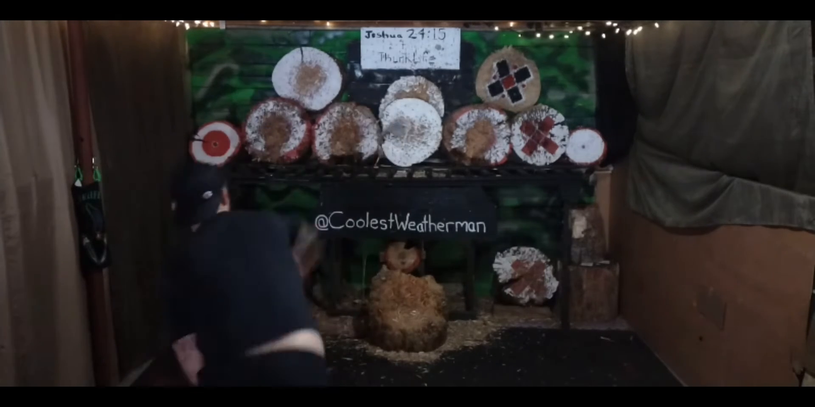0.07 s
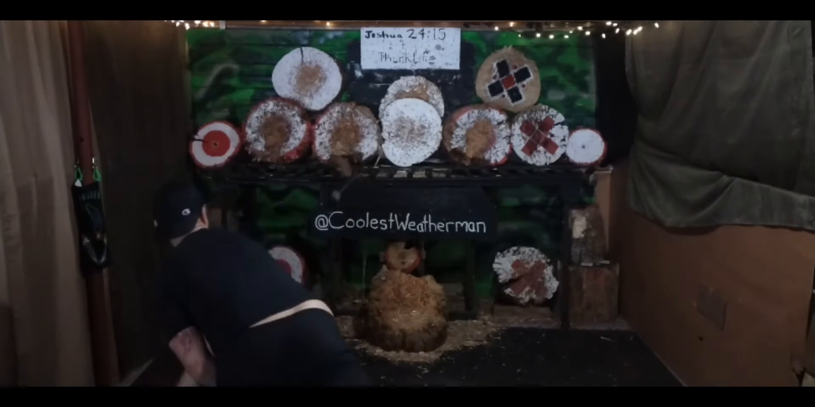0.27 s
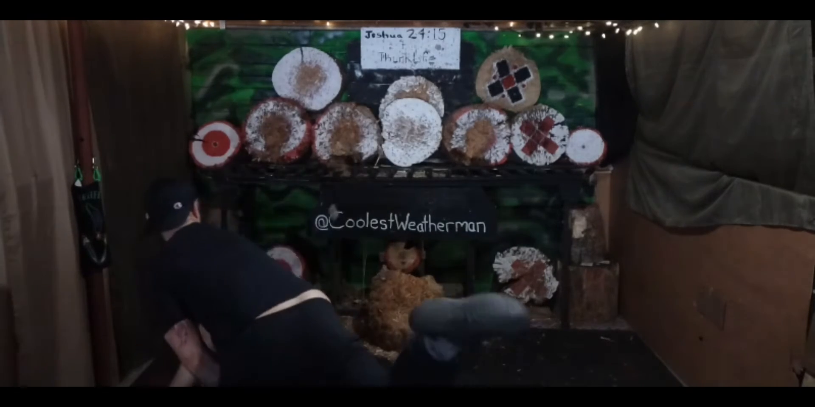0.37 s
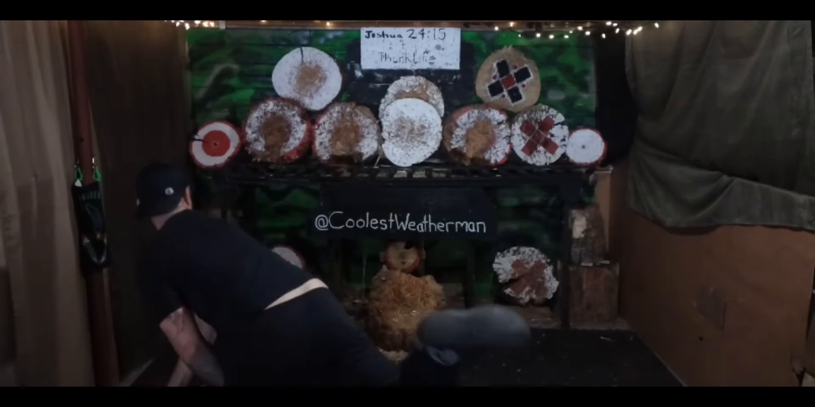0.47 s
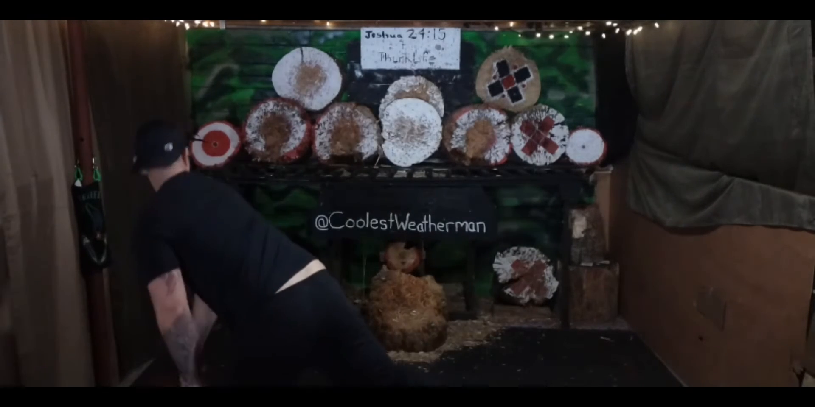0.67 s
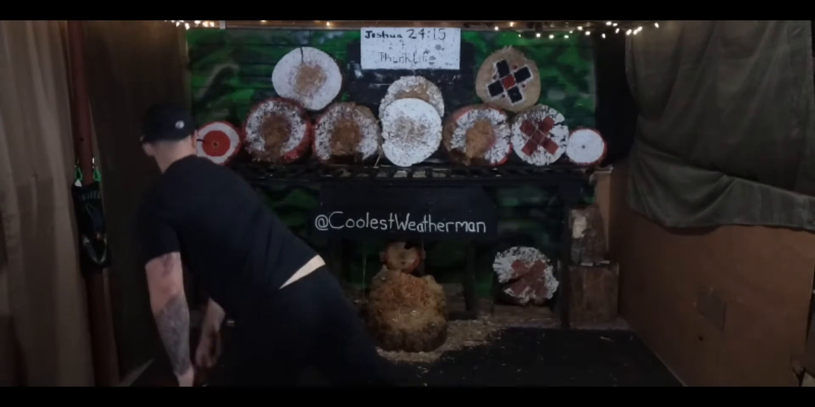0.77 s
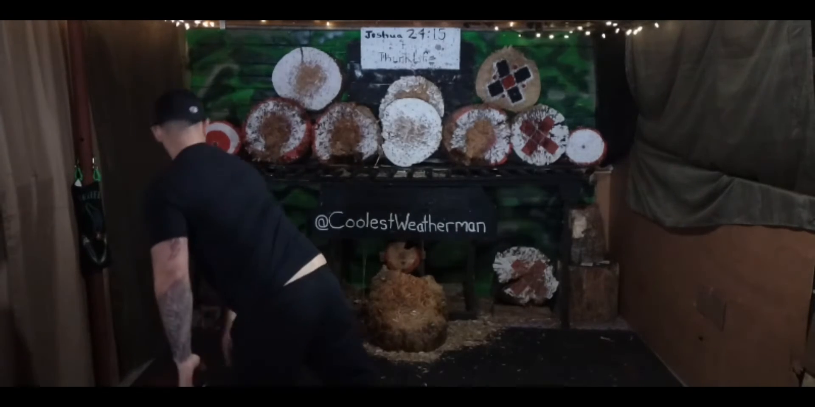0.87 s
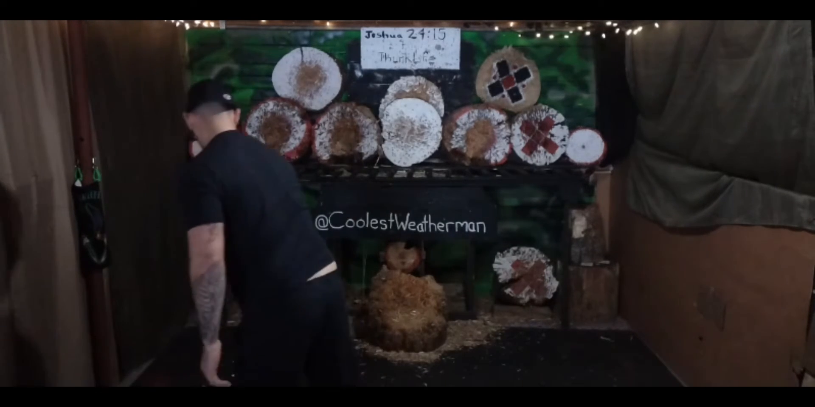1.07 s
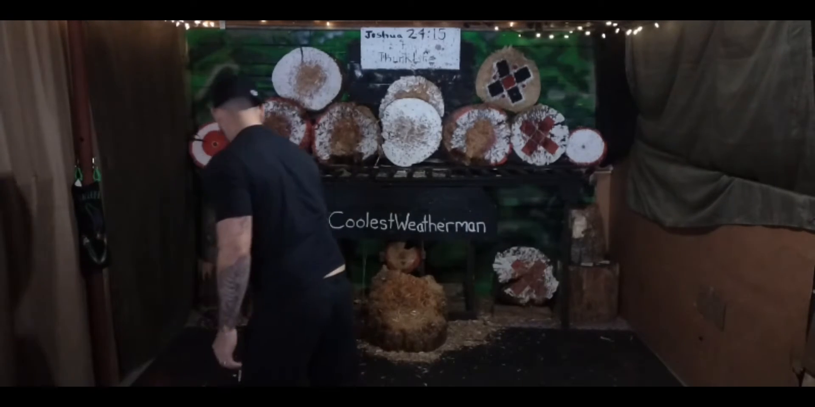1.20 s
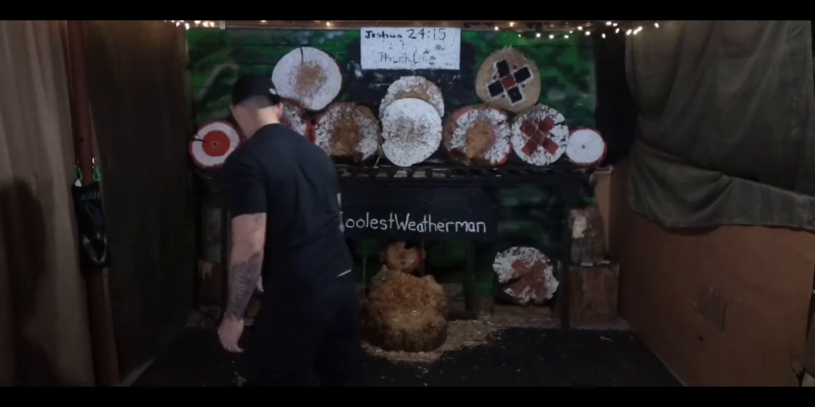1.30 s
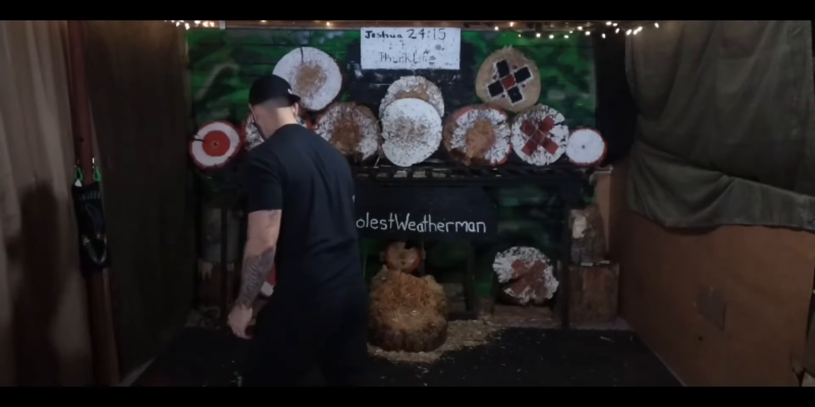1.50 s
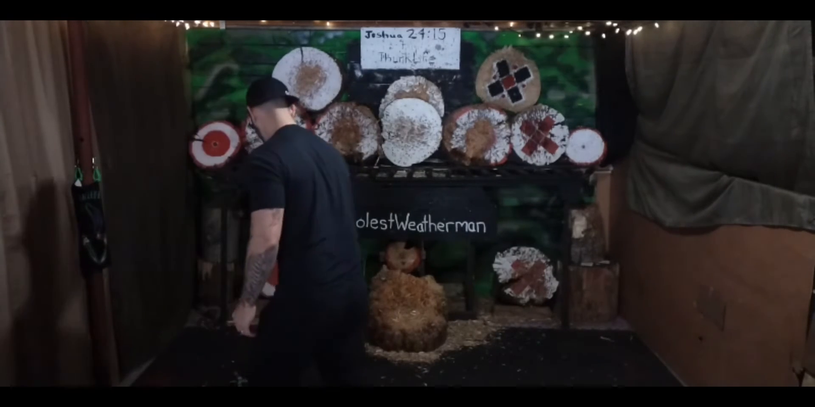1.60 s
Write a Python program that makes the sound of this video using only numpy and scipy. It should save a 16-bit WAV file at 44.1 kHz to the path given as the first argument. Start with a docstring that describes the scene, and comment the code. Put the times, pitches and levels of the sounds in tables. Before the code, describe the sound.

A knife hits a wooden target with a sharp, heavy thud and slight steel ring, then knocks onto the floor half a second later, with ever softer scuffing thumps, in a small wooden room, stereo microphone nearby.

```python
"""Over room air, cloth swishes, then a low rush leads to a thrown knife slamming into a log slice on a plank wall.
The wall and the steel ring as damped modes over decaying noise, and the small shed answers with a low boom.
The swish goes on and the structure rumbles; a faint steel tick precedes the knife landing on floor boards.
Ever weaker thumps with a scuff follow, with swells of rumble and one late brush of cloth.
Noise coloured in frequency makes the air, cloth, rush, rumble and blows; sines make rings, tick and booms."""
import sys
import numpy as np
from scipy import signal
from scipy.fft import rfft, irfft, next_fast_len
from scipy.io import wavfile
from scipy.ndimage import uniform_filter1d, map_coordinates

SR = 44100
rng = np.random.default_rng(int(sys.argv[2]) if len(sys.argv) > 2 else 0)


def inscribe(sig):
    """Save sig as 16-bit PCM at rate SR to the path in sys.argv[1].

    A 1-D sig is mono; a 2-D sig holds one channel per row.
    Samples are clipped to [-1, 1] before scaling.
    """
    pcm = np.round(np.clip(np.atleast_2d(sig).T, -1, 1) * 32767)
    wavfile.write(sys.argv[1], SR, pcm.astype(np.int16))


N = 72765  # length in samples


def amp(db):
    """Decibel law: 20 dB is a factor of ten in amplitude."""
    return 10 ** (np.asarray(db) / 20)


def along(points, hz):
    """Logarithmic pitch scale: interpolate (Hz, value) points evenly per octave."""
    point_hz, values = np.transpose(points)
    return np.interp(np.log(hz + 1), np.log(point_hz + 1), values)


def level(rows):
    """Amplitude envelope: (s, dB) rows become a gain per sample, straight in dB."""
    s, db = np.transpose(rows)
    return amp(np.interp(np.arange(N) / SR, s, db))


# Interchannel coherence. Each row: frequency in Hz, left-right correlation (1 is identical).
COHERENCE = [(60, .98), (200, .97), (400, .88), (700, .5), (1200, 0), (2500, .35), (6000, .35),
             (14000, .35)]
PATCHY_DB = 2  # standard deviation of the random gain patches in dB


def no_shape(hz, t):
    """Stationarity: 0 dB of change at every time."""
    return 0 * t


def noise(size, colour, shape_db=no_shape):
    """Partial coherence: two independent noises, scaled to rms 1 by colour, then shaped and mixed."""
    white = rng.standard_normal((2, size))
    hz, t, spectrum = signal.stft(white, SR, nperseg=512, noverlap=384)
    hz = hz[:, None]
    gain = amp(along(colour, hz))
    gain = gain / np.sqrt(np.mean(gain ** 2))
    patches = rng.standard_normal(spectrum.shape[1:])
    patches = uniform_filter1d(patches, size=4, axis=0)  # across frequency
    patches = uniform_filter1d(patches, size=12, axis=1)  # across time
    patches_db = PATCHY_DB * patches / np.std(patches)
    spectrum = spectrum * gain * amp(shape_db(hz, t) + patches_db)
    # The correlation is the cosine of twice the mixing angle.
    angle = np.arccos(np.clip(along(COHERENCE, hz), -1, 1)) / 2
    middle = spectrum[0] * np.cos(angle)
    side = spectrum[1] * np.sin(angle)
    pair = np.array([middle + side, middle - side])
    return signal.istft(pair, SR, nperseg=512, noverlap=384)[1][:, :size]


SHUDDER_LOSS = .4  # share of the decay rate while a blow still shudders


def ring(modes, t, hold=0):
    """Modal superposition: decaying sines, fed during the shudder, with a phase offset between channels."""
    out = np.zeros((2, len(t)))
    age = t - (1 - SHUDDER_LOSS) * np.minimum(t, hold)
    for hz, db, t60 in modes:
        wander = np.cumsum(rng.normal(0, .003, len(t)))
        offset = np.arccos(along(COHERENCE, hz)) * rng.choice([-.5, .5])
        decay = amp(db + rng.normal(0, 1) - 60 * age / max(t60, .01))
        out += decay * np.sin(2 * np.pi * hz * t + wander + [[offset], [-offset]])
    return out


# Spectrum of the initial crack. Each row: frequency in Hz, relative density in dB per Hz.
CRACK_COLOUR = [(200, -30.5), (700, 2), (1500, -15), (3000, -8), (4500, -14.5), (7000, -13.5),
                (12000, -22.5), (16000, -23)]
CRACK_S = 0.032  # time for the crack to fall 60 dB, before steepening
RATTLE_DB, RATTLE_PER_S = 1, 250  # depth and rate of the uneven grain of a blow
STEEPEN_DB_PER_S2 = 29.5  # tails fall faster as they fade


def blows(events, colour, t60_by_band, rings, crack_db=-80):
    """Impact excitation: noise shudders, then decays band by band in the shed as the struck bodies ring."""
    out = np.zeros((2, N + SR))
    t = np.arange(SR) / SR
    for s, db, attack, hold in events:
        def dying(hz, u):
            """Exponential decay: a straight fall in dB, slower during the shudder."""
            age = SHUDDER_LOSS * np.minimum(u, hold) + np.maximum(u - hold, 0)
            return -60 * age / along(t60_by_band, hz)

        rattle = map_coordinates(rng.standard_normal(SR), [t * RATTLE_PER_S])
        body = noise(SR, colour, dying) * amp(RATTLE_DB * rattle)
        crack = noise(SR, CRACK_COLOUR) * amp(crack_db - 60 * t / CRACK_S)
        ringing = sum(amp(ring_db) * ring(modes, t, hold) for modes, ring_db in rings)
        onset = 1 - np.exp(-(t / attack) ** 2)
        shape = amp(db - STEEPEN_DB_PER_S2 * t ** 2) * onset
        start = round(s * SR)
        out[:, start:start + SR] += (body + crack + ringing) * shape
    return out[:, :N]


# Spectrum of the room air. Each row: frequency in Hz, relative density in dB per Hz.
AIR_COLOUR = [(24, -72), (40, -24.5), (112, -9), (290, -12), (422, -16.5), (503, -8.5), (584, -11.5),
              (989, -9.5), (16000, -22.5)]
# Slow drift of the room air. Each row: time in seconds, gain in dB.
AIR_FADES = [(0, 1), (1.1, -0.5), (1.4, -2), (1.65, 0.5)]
AIR_DB = -68


def room_air():
    """Broadband background: coloured noise under a slow change of level."""
    return amp(AIR_DB) * level(AIR_FADES) * noise(N, AIR_COLOUR)


# Low rumble in the structure. Each row: time in seconds, level in dB.
RUMBLE_LEVEL = [(0, -92), (.25, -77), (.3, -54), (.45, -41), (.6, -60), (.65, -71), (.74, -69), (.9, -51),
                (1.0, -69), (1.2, -60.5), (1.3, -78), (1.65, -80)]
# Spectrum of the rumble. Each row: frequency in Hz, relative density in dB per Hz.
RUMBLE_COLOUR = [(25, -9.5), (60, -1.5), (140, 2.5), (220, -25.5), (400, -50)]


def rumble():
    """Structure-borne sound: bass noise coloured on a fine frequency grid, identical in both channels."""
    hz = np.fft.rfftfreq(N, 1 / SR)
    colour = RUMBLE_COLOUR + [(800, -120)]  # nothing audible from 800 Hz up
    bass = irfft(rfft(rng.standard_normal(N)) * amp(along(colour, hz)), N)
    return level(RUMBLE_LEVEL) * bass / np.std(bass)


# Booms of the shed. Each row: start in seconds, frequency in Hz, level in dB, swell in seconds,
# hold in seconds, time to fall 60 dB in seconds.
BOOMS = [(0.247, 118.4, -21, .004, 0.025, 0.13), (0.251, 93.5, -22.5, 0.031, 0.12, 0.37),
         (0.728, 107, -22, 0.015, 0.026, 0.094), (1.011, 102, -43.5, 0.004, 0.049, 0.085),
         (1.163, 105.3, -44.5, 0.0063, 0.022, 0.053), (1.436, 114.5, -65, .008, .025, 0.12),
         (1.59, 104, -71, 0.021, .02, 0.13)]


def boom():
    """Room resonance: a low sine of unsteady phase swells, holds and decays exponentially."""
    out = np.zeros(N)
    for s, hz, db, swell, hold, t60 in BOOMS:
        t = np.maximum(np.arange(N) / SR - s, 0)
        shape = (1 - np.exp(-t / swell)) * amp(db - 60 * np.maximum(t - hold, 0) / t60)
        wander = np.cumsum(rng.normal(0, .012, N))
        out += shape * np.sin(2 * np.pi * hz * t + wander)
    return out


# Treble of the cloth. Each row: time in seconds, level in dB.
SWISH_LEVEL = [(0, -85), (.05, -72.5), (.124, -44.5), (.178, -43), (.23, -49.5), (.35, -41), (.44, -45),
               (.485, -43.5), (.52, -52), (.55, -66), (.6, -66.5), (.64, -55.5), (.69, -66.5), (.72, -85),
               (1.5, -89), (1.56, -64.5), (1.62, -85)]
# Its spectrum. Each row: frequency in Hz, relative density in dB per Hz.
SWISH_COLOUR = [(3000, -36), (5000, -7.5), (7000, 0.5), (9000, 0.5), (11000, -1), (13700, -6.5),
                (16000, -14.5)]
# Middle range of the cloth. Each row: time in seconds, level in dB.
SWISH_MIDS_LEVEL = [(0, -72), (.05, -69.5), (.12, -51), (.2, -56.5), (.26, -63), (.4, -72), (.55, -58),
                    (.6, -61.5), (.68, -63), (.72, -81)]
# Its spectrum. Each row: frequency in Hz, relative density in dB per Hz.
SWISH_MIDS_COLOUR = [(300, -23), (900, -7.5), (2600, 0.5), (4000, -5), (6000, -6.5), (9000, -31)]


def clothes_swish():
    """Friction noise: the thrower's cloth as treble and middle noise bands with separate envelopes."""
    treble = level(SWISH_LEVEL) * noise(N, SWISH_COLOUR)
    mids = level(SWISH_MIDS_LEVEL) * noise(N, SWISH_MIDS_COLOUR)
    return treble + mids


# Rush of the arm and the flying knife. Each row: time in seconds, level in dB.
RUSH_LEVEL = [(.1, -89.5), (.178, -51.5), (.228, -41.5), (.25, -46.5), (.3, -75)]
# Spectrum of the rush. Each row: frequency in Hz, relative density in dB per Hz.
RUSH_COLOUR = [(30, -25.5), (90, -6), (300, -16), (1000, -17), (2500, -29.5)]


def throw_rush():
    """Flow noise: the moving arm and knife as low noise that rises and falls."""
    return level(RUSH_LEVEL) * noise(N, RUSH_COLOUR)


# Faint steel tick. One row: start in seconds, level in dB, frequency in Hz, time to fall 60 dB in seconds.
TICK = (.579, -56, 7000, .04)


def tick():
    """Single-mode resonance: one short decaying ping."""
    s, db, hz, t60 = TICK
    t = np.arange(SR // 10) / SR
    start = round(s * SR)
    out = np.zeros((2, N))
    out[:, start:start + len(t)] = ring([(hz, db, t60)], t)
    return out


# Small thumps on the floor. Each row: start in seconds, level in dB, attack in seconds, scuff in seconds.
THUMPS = [(1.012, -55, 0.0029, 0.01), (1.0215, -42, .001, 0.044), (1.148, -52.5, 0.0033, 0.023),
          (1.162, -47.5, 0.0091, .03), (1.436, -64, 0.0065, .03), (1.6, -75.5, .015, .02)]
# Spectrum of a thump. Each row: frequency in Hz, relative density in dB per Hz.
THUMP_COLOUR = [(94, -31), (160, -11), (359, -0.5), (581, -8.5), (822, -3.5), (1310, -8), (1960, -2.5),
                (2150, -7), (4480, -16.5), (6210, -10.5), (10700, -9.5), (13900, -14), (16000, -29.5)]
# Decay of a thump, before steepening. Each row: frequency in Hz, time to fall 60 dB in seconds.
THUMP_DECAY = [(60, 0.18), (300, 0.28), (1000, 0.25), (3000, 0.3), (10000, 0.18)]


def bounces():
    """Repeated impact: small thumps, each with a scuff, sound the three lowest board modes."""
    return blows(THUMPS, THUMP_COLOUR, THUMP_DECAY, [(BOARDS[:3], -14)])  # ring level in dB


# The knife lands. Each row: start in seconds, level in dB, attack in seconds, clatter in seconds.
LANDING = [(.731, -34, .001, 0.0037), (.7352, -18, 0.00087, 0.068)]
# Spectrum of the landing. Each row: frequency in Hz, relative density in dB per Hz.
LANDING_COLOUR = [(35, -43), (60, -27), (227, -3.5), (527, -19.5), (681, -3), (1090, -16.5), (1190, -8),
                  (2520, -17.5), (3500, -25), (7740, -28.5), (13600, -42.5), (16000, -51.5)]
# Decay over the floor, before steepening. Each row: frequency in Hz, time to fall 60 dB in seconds.
FLOOR_DECAY = [(60, 0.085), (250, 0.27), (800, 0.42), (2500, 0.33), (6000, 0.28), (10000, 0.19),
               (14000, 0.4)]
# Modes of the floor boards. Each row: frequency in Hz, relative level in dB, nominal 60 dB decay in seconds.
BOARDS = [(240.4, -8, 0.32), (273.7, 8, 0.04), (402.3, -14, 0.049), (669.4, -4, 0.38), (739.7, 10, 0.036),
          (1037, -8.5, 0.26), (1192, -11.5, 0.21), (1350, -13, 0.61), (1714, -6.5, .3), (1890, -6.5, 0.093)]


def landing():
    """Shared excitation: a clattering impact rings the floor boards, and more softly the wall and blade."""
    rings = [(BOARDS, -5.5), (WALL, -13), (BLADE, -26)]  # levels in dB over the landing
    return blows(LANDING, LANDING_COLOUR, FLOOR_DECAY, rings)


# Tip touches, then the blade slams in. Each row: start in seconds, level in dB, attack in seconds,
# shudder in seconds.
HITS = [(.238, -36, 0.0022, 0.0066), (.2475, -14.5, 0.0013, 0.098)]
# Spectrum of the hit. Each row: frequency in Hz, relative density in dB per Hz.
HIT_COLOUR = [(76, -30.5), (130, 0), (183, -10), (349, -4), (521, -16.5), (780, -3.5), (828, -8.5),
              (1890, -20.5), (2610, -17), (4680, -24.5), (7730, -20.5), (13600, -24.5), (16000, -42.5)]
# Decay of the hit, before steepening. Each row: frequency in Hz, time to fall 60 dB in seconds.
HIT_DECAY = [(40, .6), (100, 0.98), (200, .35), (400, 0.36), (1000, 0.46), (2500, 0.4), (6000, 0.21),
             (14000, 0.091)]
# Modes of target and plank wall. Each row: frequency in Hz, relative level in dB, nominal 60 dB decay in seconds.
WALL = [(443, -1, .47), (520, -10, .48), (668, -10, .55), (733, -10, .82), (808, -10, .68), (880, -13, .6),
        (953, -8, .7), (231, -8, .3), (305, -8, .28), (339, -2, .2), (572, -10, .25), (700, 0, .06),
        (775, -2, .15), (1066, -8, .2)]
# Modes of the steel blade. Each row: frequency in Hz, relative level in dB, nominal 60 dB decay in seconds.
BLADE = [(2210, -3, .08), (2770, -1, .1), (3550, 0.5, .15), (6430, -3.5, 0.11), (6840, -4.5, 0.25),
         (8300, -12.5, .12)]


def target_hit():
    """Impact and modal response: a cracking blow rings the plank wall and the steel."""
    rings = [(WALL, -4.5), (BLADE, -13)]  # levels in dB over the hit
    return blows(HITS, HIT_COLOUR, HIT_DECAY, rings, crack_db=10.5)


def scene():
    """Linear superposition: the pressures of all sources add."""
    background = room_air() + rumble() + boom()
    thrower = clothes_swish() + throw_rush()
    knife = tick() + bounces() + landing() + target_hit()
    return background + thrower + knife


# Stereo balance. Each row: frequency in Hz, left minus right level in dB.
LEAN = [(1000, 0.84), (3000, 0.5), (6000, -2), (14000, -0.5)]
LOW_HZ, TOP_HZ = 45, 16080  # bass roll-off and upper band limit
CEILING = 1.0  # amplitude at which peaks round off


def record(dry):
    """Filtering and saturation: bass rolls off, treble leans right, peaks round, then the band is limited."""
    m = next_fast_len(N + SR // 2)
    hz = np.fft.rfftfreq(m, 1 / SR)
    lean = along(LEAN, hz) / 2
    roll_off = (1j * hz / (LOW_HZ + 1j * hz)) ** 3  # third order
    x = irfft(rfft(dry, m) * amp([lean, -lean]) * roll_off, m)
    x = x / (1 + np.abs(x / CEILING) ** 4) ** .25
    return irfft(rfft(x) * (hz < TOP_HZ), m)[:, :N]


dry = scene()
out = record(dry)
inscribe(out)
```